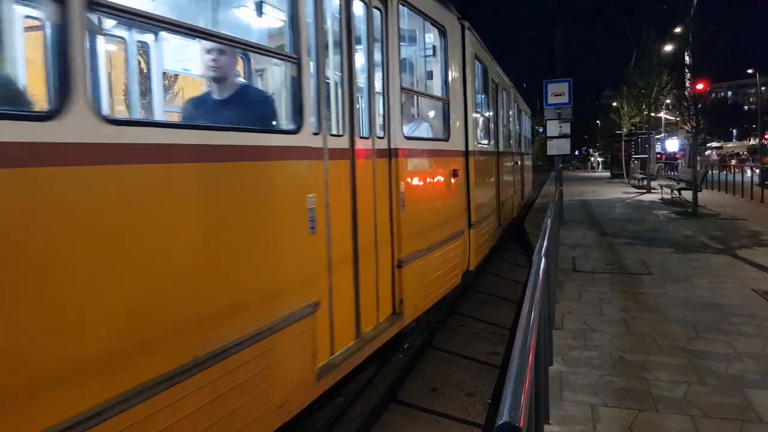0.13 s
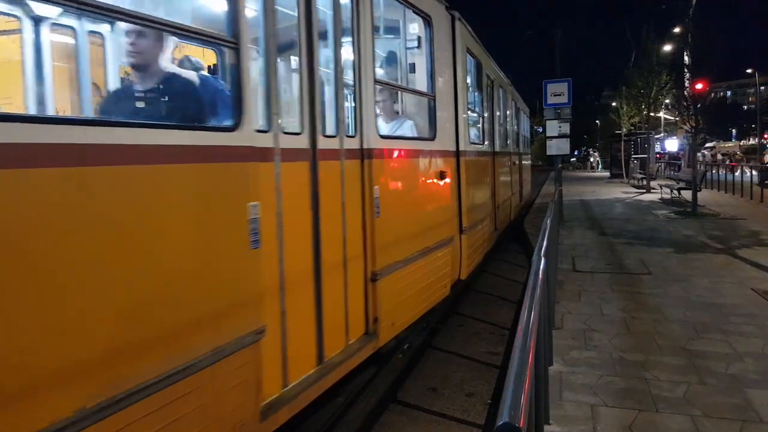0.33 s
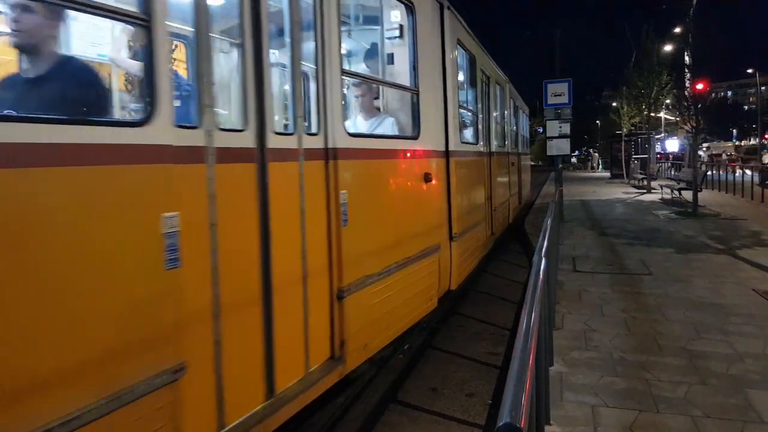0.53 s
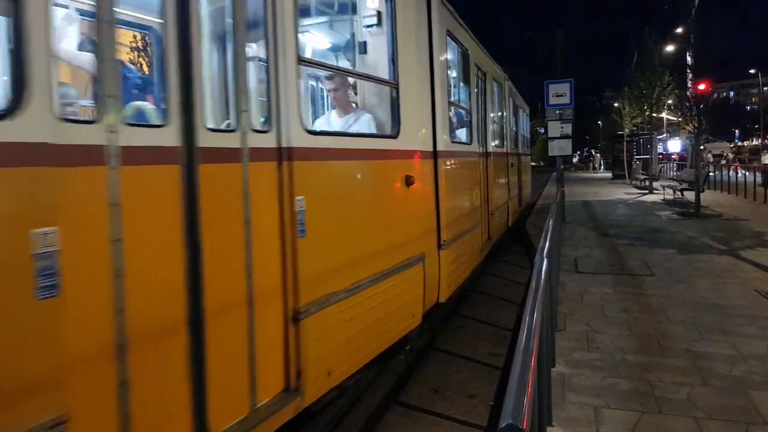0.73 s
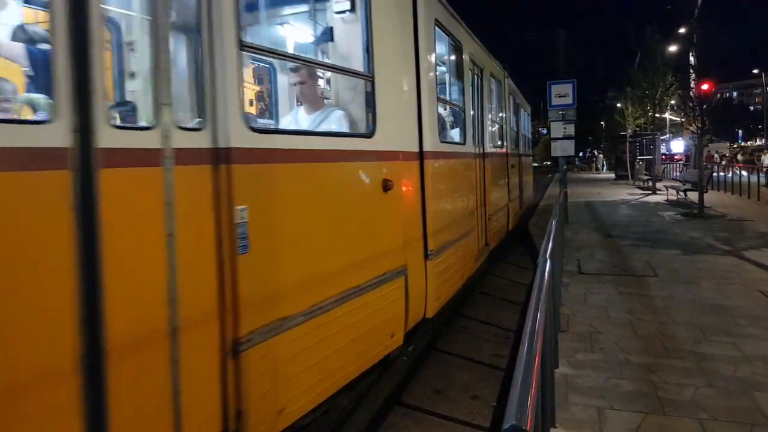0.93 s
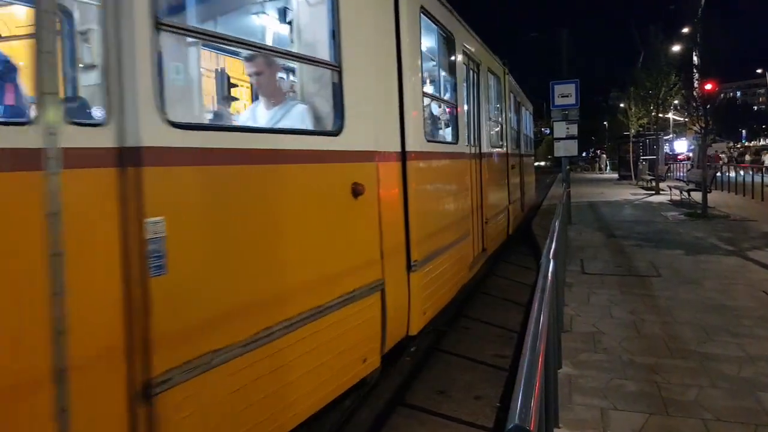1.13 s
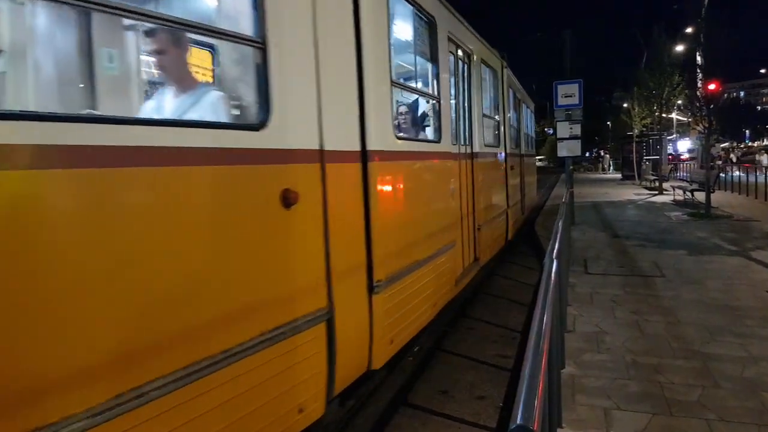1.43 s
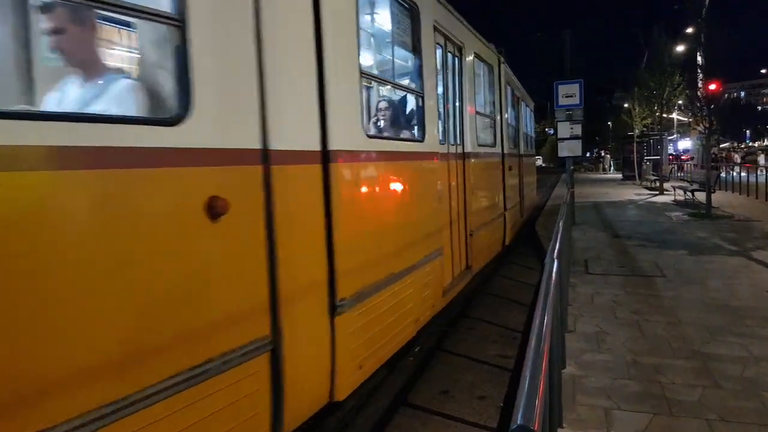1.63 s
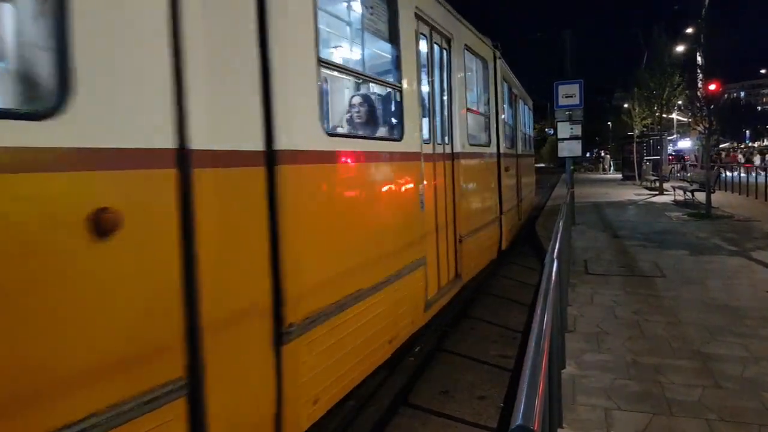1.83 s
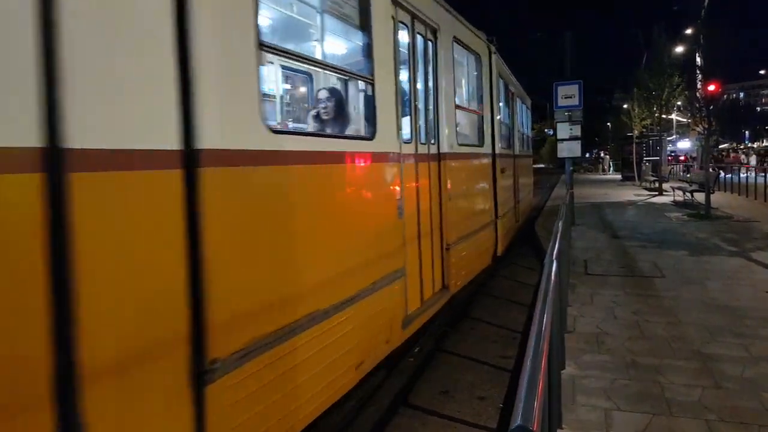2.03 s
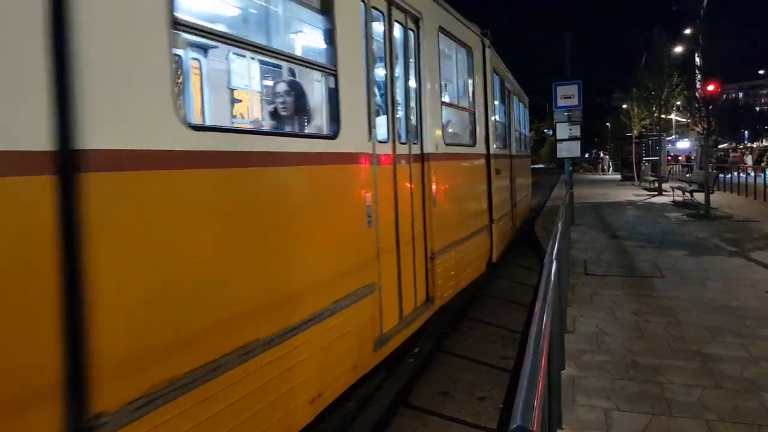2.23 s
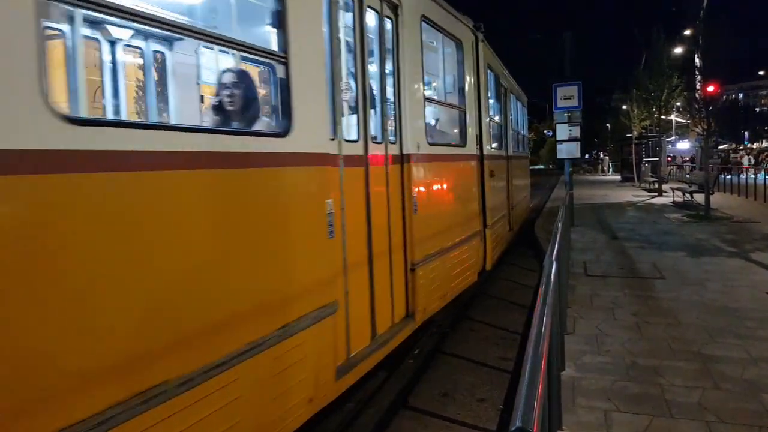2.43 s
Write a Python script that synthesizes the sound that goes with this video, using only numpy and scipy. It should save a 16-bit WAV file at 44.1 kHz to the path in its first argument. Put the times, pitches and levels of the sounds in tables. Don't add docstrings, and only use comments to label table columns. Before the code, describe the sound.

A tram rolls slowly past close by, its steel wheels rumbling, thumping and clattering on the rails

```python
import sys
import numpy as np
from scipy import signal
from scipy.fft import rfft, irfft
from scipy.io import wavfile
from scipy.ndimage import uniform_filter1d

SR = 44100
rng = np.random.default_rng(int(sys.argv[2]) if len(sys.argv) > 2 else 0)


def store_pcm(level_fs):
    pcm = np.round(np.clip(level_fs, -1, 1) * 32767).astype(np.int16)
    wavfile.write(sys.argv[1], SR, np.atleast_2d(pcm).T)


def linear_from_db(decibels):
    return 10 ** (np.asarray(decibels, float) / 20)


N = 114660

# t/s, level/dB
LOAD = [(0, -27.5), (.25, -25.5), (.45, -26.5), (.67, -21), (.86, -22), (1.08, -24.5), (1.18, -22),
        (1.4, -22), (1.6, -25), (1.72, -19.5), (1.79, -24.5), (2.15, -25), (2.22, -27.5), (2.48, -23),
        (2.6, -25.5)]
# f/Hz, level/dB per Hz
RUMBLE = [(28, -17), (54, -6), (107, -5), (199, -6.5), (375, -16.5), (548, -23.5), (789, -22),
          (1100, -70.5)]
# t/s, peak/dB, f/Hz
THUMPS = [(0.053, -25, 205), (0.299, -23.5, 110), (.39, -27, 70), (.484, -15, 185), (0.557, -18.5, 200),
          (.58, -15, 70), (0.641, -12, 200), (0.668, -12.5, 280), (0.789, -16.5, 110), (0.968, -16.5, 95),
          (1.023, -15.5, 190), (1.1, -20, 70), (1.191, -11.5, 218), (1.321, -15.5, 200),
          (1.362, -16.5, 74.9), (1.383, -14.5, 272), (1.409, -15.5, 300), (1.388, -22, 400),
          (1.425, -17.5, 69.8), (1.615, -13, 200), (1.698, -14, 183), (1.753, -16, 150),
          (1.819, -17.5, 140), (1.914, -16, 255), (2.028, -24, 260)]
# t/s, length/s, knock/dB, clatter/dB, sizzle/dB
RATTLES = [(0.564, 0.042, -72, -44.5, -60), (0.834, 0.024, -34, -30.5, -43),
           (0.976, 0.053, -47, -44.5, -54), (1.103, 0.023, -40, -39.5, -49.5),
           (1.134, 0.052, -35.5, -38, -44.5), (1.207, 0.043, -47, -41.5, -46.5),
           (1.223, 0.015, -33.5, -42, -60), (1.268, 0.04, -46, -41.5, -48.5),
           (1.393, 0.058, -43.5, -43, -53.5), (1.697, 0.032, -32, -42.5, -48.5),
           (1.725, 0.084, -58, -44.5, -51), (1.97, 0.037, -45, -48, -48), (1.66, 0.054, -34.5, -53, -85),
           (2.264, 0.0089, -38.5, -47, -74), (2.325, 0.022, -44, -48.5, -54),
           (2.423, 0.0093, -35.5, -54, -56), (2.47, 0.0076, -50, -37, -47), (2.527, 0.022, -53, -43, -51.5),
           (2.584, .015, -48, -45, -60)]
RATTLE_SAG = [-0.5, 0, 4]
# f/Hz, width/Hz, level/dB
KNOCK = [(1067, 110, -3), (1396, 67, 3), (1710, 185, -5.5), (2120, 1400, -13)]
CLATTER = [(2400, 930, 1.1), (4040, 520, -6), (4800, 770, -1.5), (6570, 1500, -9.5)]
SIZZLE = [(9200, 3500, 0), (11700, 1100, 3), (13500, 3600, -3)]
# start t/s, level/dB, f/Hz, length/s
RUBS = [(0.839, -31, 2750, 0.013), (0.86, -29, 2510, 0.013), (.842, -43, 5200, .016),
        (.845, -46, 5800, .03), (0.43, -45, 2510, 0.018), (0.525, -44, 2510, 0.017),
        (0.75, -40, 2970, 0.016), (1.008, -59, 15570, .01), (1.01, -58, 11700, .012),
        (1.068, -62, 15570, .01), (1.165, -51, 10900, .02), (1.166, -48, 9850, .015),
        (1.27, -58, 15570, .04), (1.35, -65, 15570, .035), (1.425, -60, 15570, .045),
        (1.484, -61, 11300, 0.079), (1.7, -32, 1800, .025), (1.712, -34, 1110, 0.024),
        (1.716, -48, 2400, .014), (1.745, -30, 1350, 0.013), (2.15, -35, 765, .02),
        (2.262, -29.5, 775, 0.015), (2.373, -42, 810, 0.077), (0.836, -40, 9700, 0.012),
        (0.841, -38, 1139, 0.064), (1.001, -57, 14750, .031), (1.002, -59, 10860, .031),
        (1.005, -44, 3760, 0.028), (1.031, -38, 3890, 0.032), (1.139, -42, 14745, .045),
        (1.141, -54, 15570, .051), (1.204, -48, 10880, 0.05), (1.203, -37, 14750, .014),
        (1.224, -49, 14750, .028), (1.212, -46, 15570, 0.051), (1.265, -56, 14700, 0.04),
        (1.311, -54, 15560, .031), (1.417, -60.5, 9900, 0.13), (1.485, -58, 15570, .075),
        (1.424, -55, 14740, .025), (1.696, -32, 1370, 0.01), (1.753, -53, 15570, 0.023),
        (2.132, -41.5, 2500, 0.049), (2.18, -38.5, 780, 0.062), (2.306, -31, 795, 0.046),
        (0.848, -33, 2970, .014), (2.468, -35, 840, 0.041), (2.522, -36, 2560, 0.04),
        (2.552, -51, 4050, .039)]
DISC_MODES = np.array([1800, 2400, 2510, 2750, 2970, 3760, 3890, 4050, 5200, 5800, 9600, 9850, 10900, 11300, 11700, 14750, 15570])
# t/s, peak/dB
TICKS = [(0.6065, -46), (0.6404, -39), (0.7173, -43), (0.7633, -26), (0.8, -20.5), (0.838, -29),
         (0.9108, -44), (0.9882, -44), (1.301, -38), (1.3334, -39), (1.3693, -40), (1.4653, -35.5),
         (1.505, -36), (1.5399, -33.5), (1.579, -39), (1.614, -31), (1.8462, -41.5), (2.2697, -47)]
# t/s, peak/dB, f/Hz
PINGS = [(0.6744, -51, 10200), (0.7128, -52, 11800), (0.801, -53, 10500), (0.9408, -52, 12500),
         (0.9622, -77, 9850), (1.5559, -52, 11400), (1.5808, -51, 13800), (1.6142, -48, 9000),
         (1.163, -48, 9200), (2.334, -53, 13500), (1.628, -51, 11100), (1.6631, -61, 11300),
         (1.8457, -61, 10000)]
# t/s, level/dB
NEARNESS = [(0.0, -52), (0.47, -54.5), (0.8, -47.5), (1.06, -52), (1.29, -50.5), (1.66, -50), (1.8, -53),
            (2.11, -54), (2.3, -55), (2.48, -52), (2.6, -51)]
# f/Hz, level/dB per Hz
HISS = [(290, -12), (500, -14), (749, -4.5), (1110, -3.5), (2710, -13.5), (6740, -25), (8130, -36.5),
        (12200, -30.5), (15800, -48)]
# f/Hz, width/Hz, level/dB
RAIL = [(721, 104, -48), (2460, 160, -56), (6700, 1400, -94)]
# t/s, level/dB
SHAKE = [(0, -22), (.4, -31.5), (.78, -22.5), (1.1, -45), (1.16, -13.5), (1.22, -33), (1.28, -25),
         (1.34, -25), (1.39, -16), (1.46, -16.5), (1.57, -31), (1.66, -15.5), (1.76, -14), (1.8, -23),
         (1.85, -21), (2.1, -31.5), (2.35, -19), (2.6, -16)]
# f/Hz, share/1
LIKENESS = [(60, 1), (200, 0.98), (400, 1), (800, 0.9), (1500, 0.59), (3000, 0.24), (6000, 0.18),
            (14000, 0.11)]
# f/Hz, level/dB
LEFT_LEAD = [(60, 2.0), (400, 1.6), (700, 2.4), (1500, .9), (2500, .5), (5000, 2.5), (8500, 8),
             (15000, 6.5)]
# f/Hz, lag/samples
PORT_LAG = [(300, 11.3), (900, 10.7), (2000, 11.5), (2800, 12.33), (16000, 14.36)]


def roar():
    return linear_from_db(in_time(LOAD) + 1.24) * evened(banded(RUMBLE, patchy_db=1.9), 0.077)


def thumps():
    out = 0
    for s, db, hz in THUMPS:
        rise_s, fall_s = 0.99 / hz, 1.54 / hz
        tone = wavering(hz, 0.0574, 28.5)
        out = out + linear_from_db(db - 1.5) * swell(s, rise_s, rise_s, fall_s, 0) * pair(tone, 0, hz)
    return out


def rattles():
    rise_s, fall_s, grain_db = 0.0038, 0.015, 3
    halo_s, halo_db = 0.18, -9
    out = 0
    for k, group in enumerate((KNOCK, CLATTER, SIZZLE)):
        jolts = [swell(s, length, rise_s, fall_s, RATTLE_SAG[k]) for s, length, *_ in RATTLES]
        power = linear_from_db(np.array(RATTLES)[:, 2 + k]) ** 2 @ np.array(jolts) ** 2
        halo = uniform_filter1d(uniform_filter1d(power, int(halo_s * SR)), int(halo_s * SR / 2))
        grain = rng.standard_normal((2, N)) * linear_from_db(grain_db * drift(290))
        out = out + np.sqrt(power + linear_from_db(halo_db) ** 2 * np.abs(halo)) * body(grain, group)
    return out


def squeaks():
    edge_s, sag_db, steady_below_hz = 0.007, 7, 1900
    out = np.zeros((2, N))
    flutter = rms_one(linear_from_db(2.2 * drift(54) + 4 * drift(260)))
    for (s, db, hz, length), shift in zip(RUBS, rng.integers(0, N, len(RUBS))):
        if hz > DISC_MODES[0] / 1.2:
            hz = DISC_MODES[np.argmin(np.abs(np.subtract(DISC_MODES, hz)))]
        unrest = min(hz / steady_below_hz, 1)
        tone = wavering(hz, 0.003 + unrest * 34 / hz, 117.4)
        tone = tone * linear_from_db(db + 1.0) * np.roll(flutter, shift) ** unrest
        rub = swell(s, length, edge_s, edge_s, unrest * sag_db)
        out += rub * pair(tone, np.roll(tone, N // 2), hz)
    return out


def loose_fitting():
    falling = [(s, db, 7460 - 460 * s) for s, db in TICKS]  # Hz, sinking in Hz per s
    return ticks(falling, width_hz=1600, gain_db=5, rough=0.4)


def pings():
    return ticks(PINGS, width_hz=6700, gain_db=16, rough=8.7)


def ticks(rows, width_hz, gain_db, rough):
    slip_s = 0.00073
    out, t = np.zeros((2, N)), np.arange(600) / SR
    burst = np.exp(-((t - 1.9 * slip_s) / slip_s) ** 2)
    for (s, db, hz), white in zip(rows, rng.standard_normal((len(rows), 2, len(t)))):
        phase = 2 * np.pi * hz * t
        slip = (rough * white + np.array([np.sin(phase), np.cos(phase)])) * burst
        ring = pair(*resonate(resonate(slip, hz, width_hz), hz, width_hz), hz)
        start = int(s * SR)
        out[:, start:start + len(t)] += ring / np.abs(ring).max() * linear_from_db(db + gain_db)
    return out


def hiss():
    near = 0.67 * in_time(NEARNESS)
    return linear_from_db(-39 + near - near.mean()) * banded(HISS, patchy_db=1.8)


def rail_ring():
    load = in_time(LOAD)
    swing = linear_from_db(0.16 * (load - load.mean()))
    out = 0
    for hz, width_hz, db in RAIL:
        ring = body(rng.standard_normal((2, N)), [(hz, width_hz, 0)])
        out = out + linear_from_db(db + 0.76 * drift(11.0)) * swing * ring
    return out


def track_bed():
    hz = 53.86
    boom = wavering(hz, 0.1343, 14.2)
    return linear_from_db(in_time(SHAKE) - 3.5 + 3.1 * drift(24)) * pair(boom, 0, hz)


def in_time(rows):
    s, db = np.transpose(rows)
    return np.interp(np.arange(N) / SR, s, db)


def at_hz(points, hz):
    table_hz, value = np.transpose(points)
    return np.interp(np.log(hz), np.log(table_hz), value)


def rms_one(x):
    return x / np.sqrt(np.mean(x ** 2) + 1e-20)


def evened(x, seconds):
    power = uniform_filter1d(np.mean(x ** 2, 0), int(seconds * SR))
    return rms_one(x / np.sqrt(power + 0.041))


def drift(rate):
    step = 40
    r = np.exp(-2 * np.pi * rate * step / SR)
    white = rng.standard_normal(N // step + 2002)
    slow = signal.lfilter([1], [1, -2 * r, r * r], white)[2000:]
    return np.interp(np.arange(N) / step, np.arange(len(slow)), rms_one(slow))


def wavering(hz, share, rate):
    pitch = hz * (1 + share * drift(rate))
    return np.sqrt(2) * np.sin(2 * np.pi * np.cumsum(pitch) / SR)


def swell(s, length, rise, fall, sag_db):
    t = np.arange(N) / SR - s
    hold = linear_from_db(-sag_db * np.clip(t / length, 0, 1))
    return np.clip(t / rise, 0, 1) * hold * np.exp(-np.clip(t - length, 0, 1) / fall)


def resonate(x, hz, width_hz):
    r = np.exp(-np.pi * width_hz / SR)
    turn = 2 * np.pi * min(hz, 0.45 * SR) / SR
    gain = (1 - r * r) / 2
    return signal.lfilter([gain, 0, -gain], [1, -2 * r * np.cos(turn), r * r], x + 1e-18)


def pair(mid, side, hz):
    sign = np.array([[1], [-1]])
    alike = np.clip(at_hz(LIKENESS, hz), 0, 1)
    both = np.sqrt((1 + alike) / 2) * mid + np.sqrt((1 - alike) / 2) * side * sign
    return both * linear_from_db(at_hz(LEFT_LEAD, hz) / 2 * sign)


def body(white, resonances):
    out = 0
    for k, (hz, width_hz, db) in enumerate(resonances):
        ring = resonate(resonate(white, hz, width_hz), hz, 3.3 * width_hz)
        out = out + (-1) ** k * linear_from_db(db) * pair(*ring, hz)
    return rms_one(out)


def banded(spectrum, patchy_db):
    out, together = 0, drift(6.2)
    lowest, highest = spectrum[0][0], spectrum[-1][0]
    edges = lowest * 2 ** np.arange(0, np.log2(highest / lowest) + 0.3, 1 / 3)
    white = rng.standard_normal((2, 2, N))
    for k, (low, high) in enumerate(zip(edges, edges[1:])):
        band_pass = signal.butter(2, [low, high], "band", fs=SR, output="sos")
        bands = signal.sosfilt(band_pass, white[k % 2])
        hz = np.sqrt(low * high)
        flicker_db = patchy_db * (0.14 * together + drift(14.4))
        out = out + linear_from_db(at_hz(spectrum, hz) + flicker_db) * pair(*bands, hz)
    return rms_one(out)


def scene():
    tram = roar() + thumps() + rattles() + squeaks() + loose_fitting() + pings()
    left, right = tram + hiss() + rail_ring() + track_bed()
    hz = np.arange(1, N // 2 + 2) * SR / N
    delay = np.exp(-2j * np.pi * hz * at_hz(PORT_LAG, hz) / SR)
    return np.array([left, irfft(rfft(right) * delay, N)])


def band_limit(x):
    return signal.sosfilt(signal.butter(12, 15850, fs=SR, output="sos"), x)


def record(dry):
    low_cut = signal.butter(2, 32, "high", fs=SR, output="sos")
    top_cut = signal.ellip(6, 0.5, 32, 15900, fs=SR, output="sos")
    mix = signal.sosfilt(low_cut, 0.9 * np.tanh(dry / 0.9))
    mix = signal.sosfilt(top_cut, mix)
    return band_limit(mix)


dry = scene()
out = record(dry)
store_pcm(out)
```